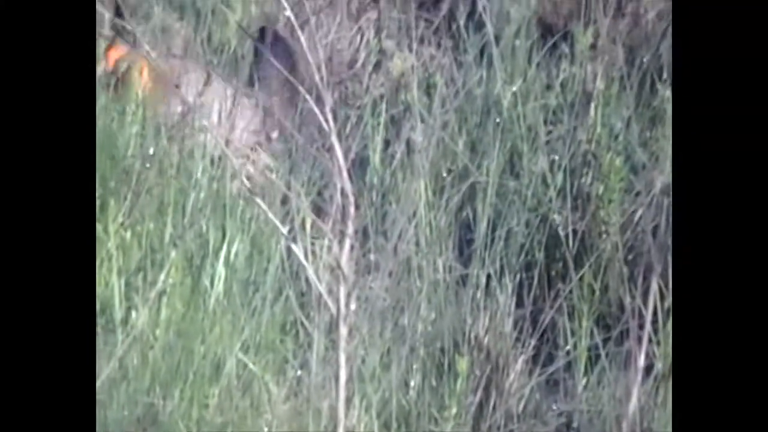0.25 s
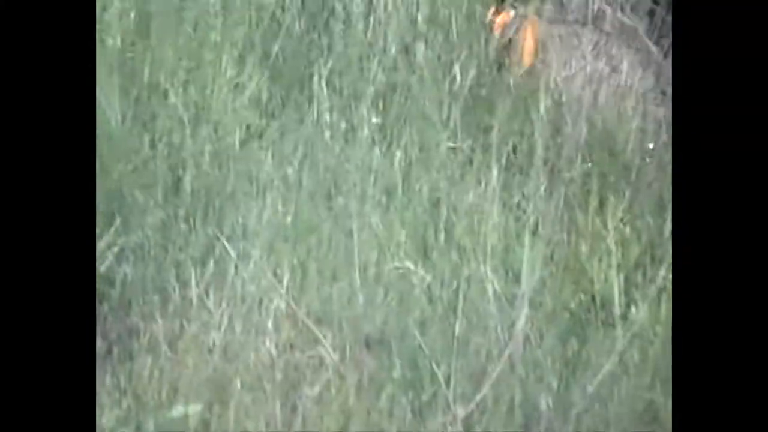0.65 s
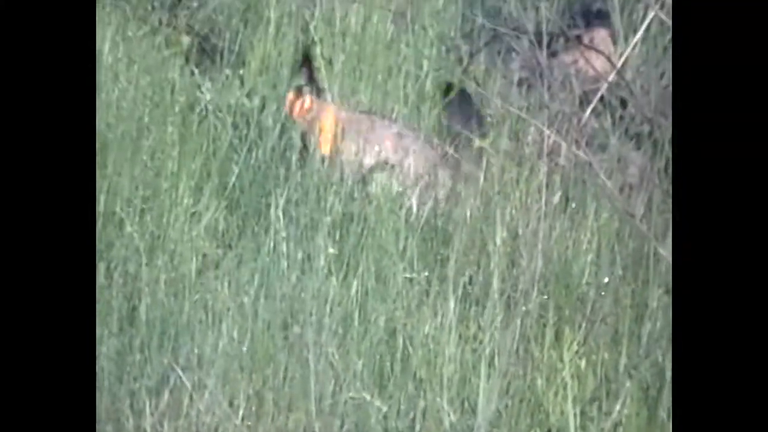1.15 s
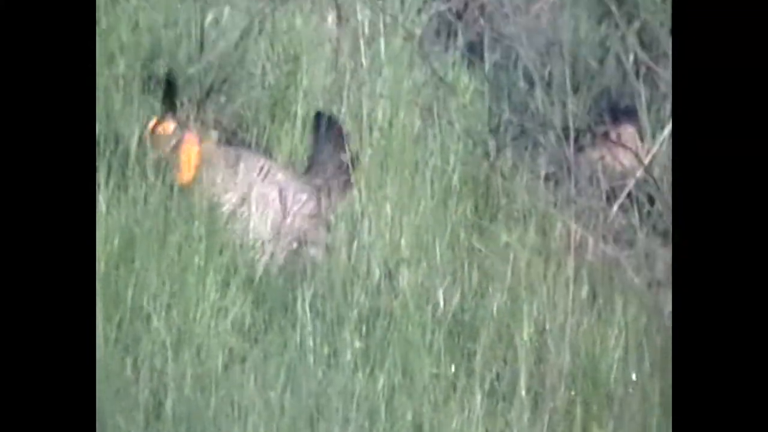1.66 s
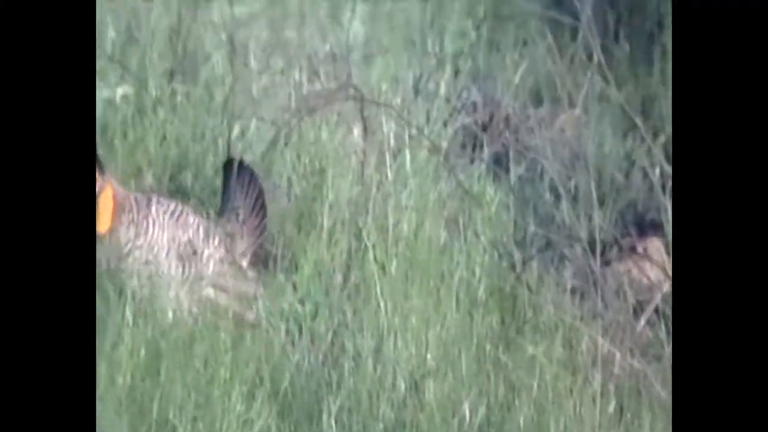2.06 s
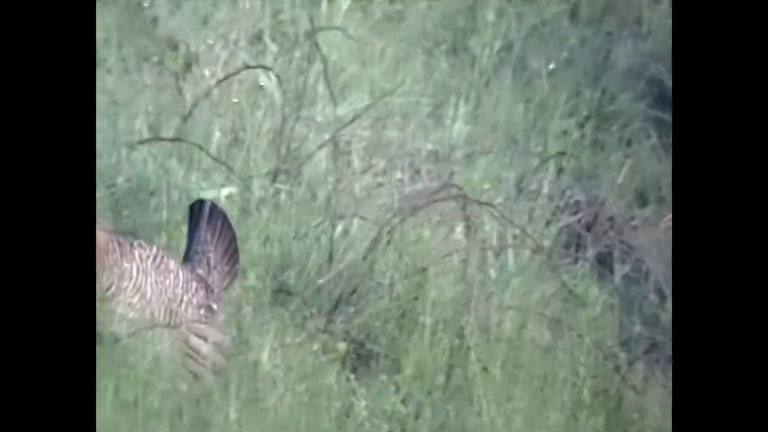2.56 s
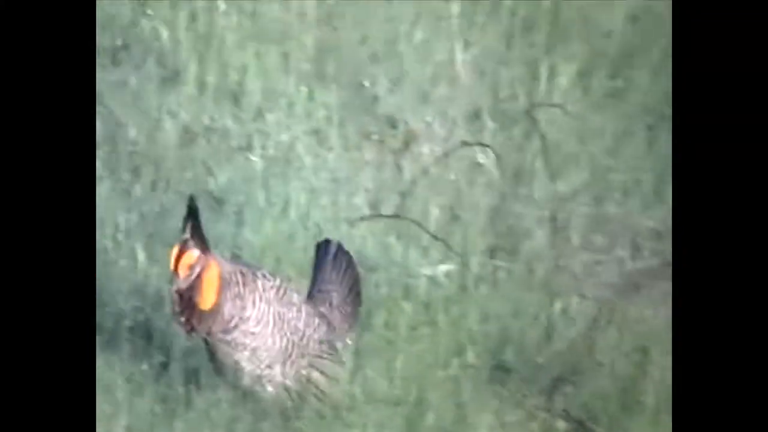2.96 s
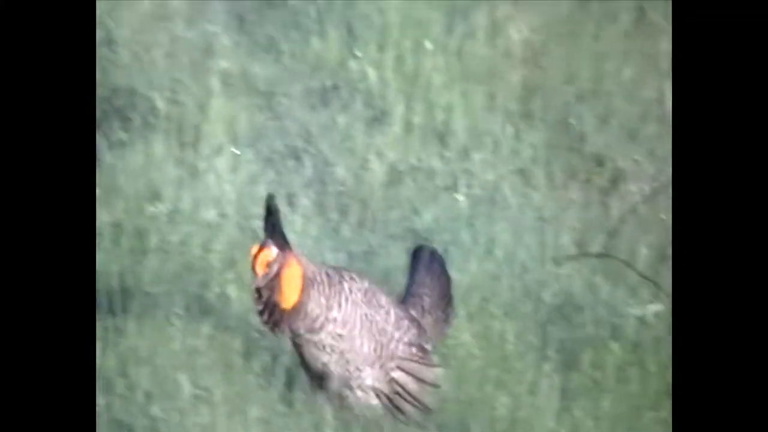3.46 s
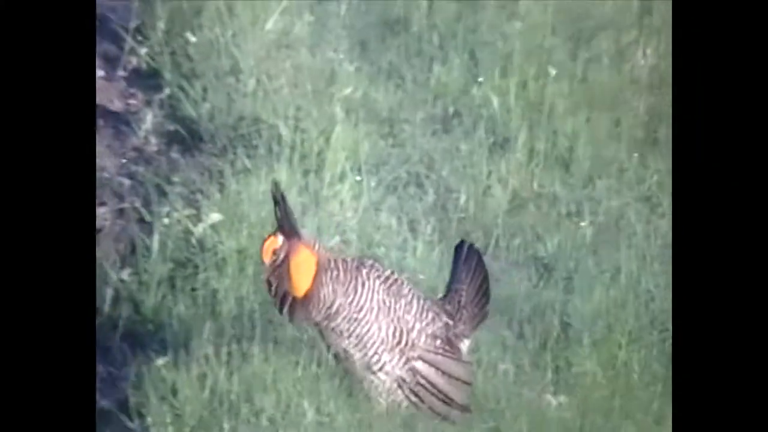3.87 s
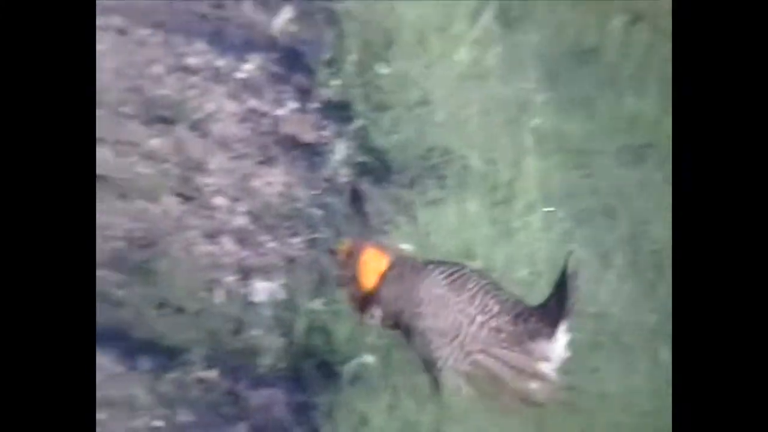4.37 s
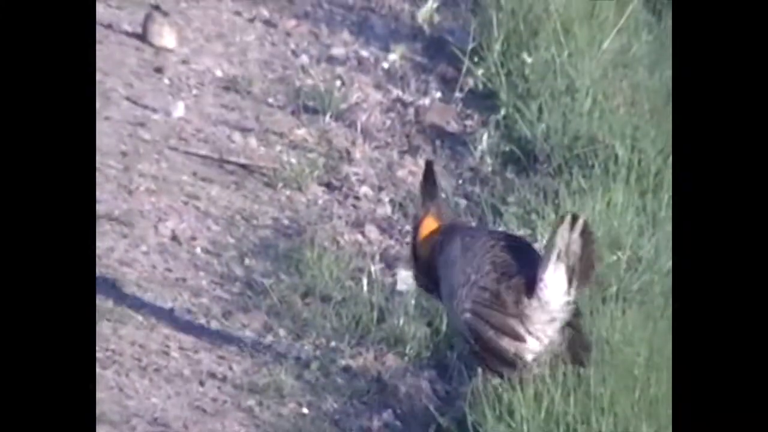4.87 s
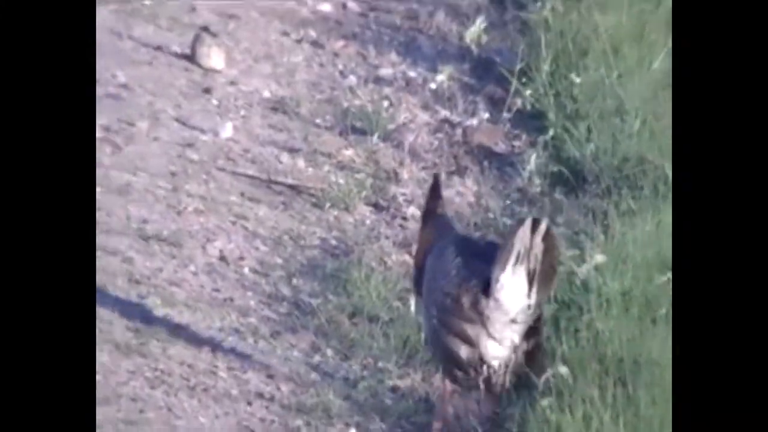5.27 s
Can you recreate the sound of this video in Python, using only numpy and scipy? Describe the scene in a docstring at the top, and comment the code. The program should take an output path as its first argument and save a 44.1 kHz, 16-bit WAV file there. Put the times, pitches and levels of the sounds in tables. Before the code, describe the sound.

A near small bird whistles three pure glides over soft rumble and hiss; later a distant buzz, a hoarse squawk and one small click.

```python
"""Quiet open grassland over a low rumble, thin hiss and a hand-guided camera's own faint whine.
At first a pulsing note (amplitude-modulated sine) dies away and a bird repeats high, warbled chips.
Then a near songbird slides through pure whistles (swept sines); other birds chip and whistle around it.
Later a far bird sings two falling phrases, a pulsed buzz sounds during the second, and a rising squawk
breaks into rasps. Handling knocks (damped sines) and rustles (filtered grains) recur; a modal click is last."""
import sys
import numpy as np
from scipy import signal
from scipy.fft import rfft, irfft
from scipy.io import wavfile

SR = 44100
rng = np.random.default_rng(int(sys.argv[2]) if len(sys.argv) > 2 else 0)


def materialize(psi):
    """Save the field psi as 16-bit PCM at rate SR to the path in sys.argv[1].

    A 1-D psi becomes a single channel; in a 2-D psi each row is a channel.
    """
    bounded = np.clip(np.atleast_2d(psi).T, -1, 1)
    quanta = np.round(bounded * 32767).astype(np.int16)
    wavfile.write(sys.argv[1], SR, quanta)


N = 243431  # length in samples


def amp(db):
    """Decibel law: converts a level to an amplitude gain."""
    return 10 ** (np.asarray(db) / 20)


def unit(x):
    """Normalisation: scales a signal to an rms of 1."""
    return x / np.sqrt(np.mean(x ** 2) + 1e-30)


def read(points, hz):
    """Interpolation of (frequency, value) points on a logarithmic frequency axis."""
    point_hz, value = np.transpose(points)
    return np.interp(np.log(hz + 1), np.log(point_hz + 1), value)


def coloured(x, db_at):
    """Spectral shaping: weights each frequency by the gain db_at(Hz), then scales to an rms of 1."""
    n = x.shape[-1]
    spectrum = rfft(x) * amp(db_at(np.fft.rfftfreq(n, 1 / SR)))
    return unit(irfft(spectrum, n))


def wander(n, per_s):
    """Random modulation: straight lines between normal random values, per_s of them a second."""
    return np.interp(np.arange(n) * per_s / SR, np.arange(4096), rng.standard_normal(4096))


def lowpass(x, edge_hz):
    """Band limiting: a steep linear-phase low-pass on both channels."""
    taps = signal.firwin(401, edge_hz, window=("kaiser", 8), fs=SR)
    return signal.oaconvolve(x, taps[None], "same")


def add(mix, s, sound, pan_db):
    """Intensity panning: adds a mono sound at s seconds, stronger on the left by pan_db."""
    sides = amp([[pan_db / 2], [-pan_db / 2]])
    part = mix[:, max(round(s * SR), 0):][:, :len(sound)]
    part += sides / sides.mean() * sound[:part.shape[1]]


def curves(rows):
    """Control curves: returns the start time and each column interpolated at every sample."""
    s, *columns = np.transpose(rows)
    t = np.arange(s[0], s[-1], 1 / SR)
    return s[0], *(np.interp(t, s, c) for c in columns)


def tone(hz, db):
    """Phase accumulation: a sine whose pitch and rms level follow the given curves."""
    return np.sqrt(2) * amp(db) * np.sin(2 * np.pi * np.cumsum(hz) / SR)


def scatter(x, delay, t60):
    """Diffuse reflection: a delayed, decaying cloud of random echoes, independent in each ear."""
    t = np.arange(SR // 2) / SR
    taps = rng.standard_normal((2, len(t))) * amp(-60 * t / t60)
    taps /= np.linalg.norm(taps, axis=1, keepdims=True)  # unit energy
    wet = signal.oaconvolve(x.mean(0)[None], taps, axes=1)
    return np.pad(wet, ((0, 0), (round(abs(delay) * SR), 0)))[:, :N]


def crackle(n, per_s):
    """Granular friction: random grains of uneven size over a soft hiss, all fluttering together."""
    size = amp(3.5 * np.minimum(rng.exponential(1, n), 3))
    grains = .2 + size * (rng.random(n) < per_s / SR)
    flutter = amp(3.5 * wander(n, 260))
    return rng.choice([-1, 1], n) * grains * flutter


def glide(length, hz, glide_hz, db, warble_hz=0):
    """Frequency modulation: a short sliding whistle, or a chip when its pitch warbles unevenly."""
    n = round(length * SR)
    turns = np.cumsum(90 * (1 + 0.33 * wander(n, 120))) / SR
    warble = 0.69 * np.sin(2 * np.pi * turns) + 0.4 * wander(n, 800)
    pitch = hz + glide_hz * np.linspace(-.5, .5, n) + warble_hz * warble
    dips_db = 6.6 * warble * (warble_hz > 0)  # a chip is loudest at the bottom of each warble
    return tone(pitch, db - dips_db) * signal.windows.tukey(n, .6)


def scrape(length, centre_hz, octaves, db):
    """Band-limited friction: crackle around centre_hz that starts quickly and fades."""
    n = SR // 4
    t = np.arange(n) / SR
    hiss = coloured(crackle(n, 1400), lambda f: -4.4 * (np.log2((f + 1) / centre_hz) / octaves) ** 2)
    envelope = np.interp(t / length, [0, .16, 1], [0, 1, 0])
    return amp(db) * hiss * envelope


# Pitch and level curves of the near bird's three long slides.
# Columns: time_s, pitch_hz, level_db
SLIDES = [
    [(0.6, 3828, -75.5), (0.62, 3790, -61.5), (0.686, 3608, -43), (0.72, 3450, -39.5), (0.746, 3417, -43),
     (0.77, 3410, -74)],
    [(1.15, 5270, -74.5), (1.166, 4963, -56.5), (1.19, 4916, -50.5), (1.216, 4960, -53), (1.284, 4600, -50),
     (1.39, 4355, -39.5), (1.398, 4327, -42.5), (1.408, 4280, -62)],
    [(1.475, 4065, -75), (1.565, 3940, -44), (1.609, 3916, -42.5), (1.699, 3126, -33.5), (1.747, 2959, -34),
     (1.787, 2910, -50.5), (1.825, 2895, -41.5), (1.919, 2921, -62.5), (1.95, 2894, -78.5)],
]
# a short, gently sinking note links the last two slides, and fades from its start
LINK_S, LINK_LENGTH_S, LINK_HZ, LINK_SAG_HZ_PER_S = 1.412, .105, 4760, 1500
LINK_DB, LINK_FADE_DB_PER_S = -47, 230


def near_song():
    """Pure-tone glides with diffuse reflection: echoes off the grass beat with the moving pitch."""
    out = np.zeros((2, N))
    for note in SLIDES:
        s, hz, db = curves(note)
        waver = 1 + .002 * wander(len(hz), 170)
        flutter_db = 1.3 * (hz / 4500) ** 2 * wander(len(hz), 220)  # deeper at high pitch
        voice = tone(hz * waver, db + flutter_db) * signal.windows.tukey(len(hz), .03)
        add(out, s, voice, pan_db=-6.7)
    t = np.arange(0, LINK_LENGTH_S, 1 / SR)
    link_hz = LINK_HZ - LINK_SAG_HZ_PER_S * t + 20 * wander(len(t), 170)
    link = tone(link_hz, LINK_DB - LINK_FADE_DB_PER_S * t)
    add(out, LINK_S, link * signal.windows.tukey(len(t), .35), pan_db=-9.5)
    grass = amp(-15) * scatter(out, delay=.002, t60=.07)
    late_echo = amp(-39) * scatter(out, delay=.08, t60=1.2)
    return out + grass + late_echo


# the note sinks and fades together, both easing out over the same time constant
PULSED_LENGTH_S, PULSED_FADE_S, PULSES_PER_S = .55, .19, 33.8
PULSED_HZ, PULSED_SAG_HZ, PULSED_DB, PULSED_DROP_DB = 2986, 149.5, -56.5, 33.5


def pulsed_note():
    """Amplitude modulation: a sinking whistle throbs as it dies away to a faint trace."""
    out, t = np.zeros((2, N)), np.arange(0, PULSED_LENGTH_S, 1 / SR)
    spent = 1 - np.exp(-t / PULSED_FADE_S)
    hz = PULSED_HZ - PULSED_SAG_HZ * spent + 12 * wander(len(t), 150)
    db = PULSED_DB - PULSED_DROP_DB * spent + 2.1 * wander(len(t), 90)
    throb = 1 - .5 * np.cos(2 * np.pi * PULSES_PER_S * t)
    add(out, 0, tone(hz, db) * throb, pan_db=-6.0)
    return out


# One bird's repeated high chip.
# Columns: start_s, pitch_hz, level_db
SERIES_CHIPS = [(.008, 4930, -71), (0.239, 4920, -68), (.36, 4970, -73), (0.483, 4960, -70),
                (.594, 4970, -69), (.703, 5150, -78.5), (.798, 5360, -81)]
SERIES_LENGTH_S, SERIES_FALL_HZ, SERIES_WARBLE_HZ = 0.057, 130, 240
# Single chips of other birds; pan is positive to the left.
# Columns: start_s, length_s, pitch_hz, glide_hz, level_db, pan_db
SINGLE_CHIPS = [(0.713, .043, 2710, -100, -72.5, -19), (1.032, .023, 5270, -430, -72.5, -13),
                (2.008, .05, 4400, 130, -72.5, -17), (2.015, .05, 3700, 100, -77, -12),
                (3.013, 0.074, 2923, -60, -71.5, 13), (3.72, 0.034, 2130, -71, -65, -14),
                (3.925, 0.068, 5730, 1401, -74.5, -8), (4.08, .04, 5720, 163, -76.5, 6)]
WARBLE_SHARE = 0.045  # warble depth of a single chip as a share of its pitch
# Two falling phrases of a far bird on the left.
# Columns: start_s, length_s, pitch_hz, glide_hz, level_db
ANSWER_NOTES = [(3.433, .14, 3930, -640, -73), (3.623, 0.049, 3430, -190, -73.5),
                (4.068, 0.069, 4103, -134, -70), (4.167, 0.045, 4384, -170, -70.5),
                (4.301, 0.11, 3700, -850, -81), (4.432, 0.08, 3100, -160, -71.5)]
ANSWER_PAN_DB = 18
# Faint far whistles, and at 2.07 s a faint echo of the near song.
# Columns: start_s, length_s, pitch_hz, glide_hz, level_db
FAINT_WHISTLES = [(.746, .11, 2990, -245, -78), (0.907, .13, 5720, 390, -76.5),
                  (2.07, 0.097, 2993, -10, -83.5), (2.804, .09, 2342, 17, -78),
                  (3.175, .13, 3650, -62, -83.5), (4.241, .16, 1735, 140, -76.5)]


def far_birds():
    """Frequency-modulated chips and plain glides, placed left and right by intensity panning."""
    out = np.zeros((2, N))
    for s, hz, db in SERIES_CHIPS:
        chip = glide(SERIES_LENGTH_S, hz, -SERIES_FALL_HZ, db, SERIES_WARBLE_HZ)
        add(out, s, chip, pan_db=6)
    for s, length, hz, glide_hz, db, pan_db in SINGLE_CHIPS:
        add(out, s, glide(length, hz, glide_hz, db, WARBLE_SHARE * hz), pan_db)
    for s, *note in ANSWER_NOTES:
        add(out, s, glide(*note), ANSWER_PAN_DB)
    for s, *note in FAINT_WHISTLES:
        add(out, s, glide(*note), pan_db=-4.5)
    return out


# the buzz starts loud, high and fast, and settles into a trill; pairs are (at the start, settled)
BUZZ_HZ, BUZZ_SWEEP_HZ, BUZZ_PER_S = (3081, 2906), (200, 405), (145, 65)
BUZZ_S, BUZZ_LENGTH_S, BUZZ_ATTACK_S, BUZZ_SETTLE_S = 4.018, .775, 0.023, .128
BUZZ_DB, BUZZ_ACCENT_DB, BUZZ_ACCENT_S = -73, 21.5, 0.11
# soon after its start it runs briefly clear
BUZZ_CLEAR_S, BUZZ_CLEAR_WIDTH_S = .072, .024
# it drops in from above, and drops away at the end
BUZZ_SCOOP_HZ, BUZZ_SCOOP_S, BUZZ_DROP_HZ, BUZZ_RELEASE_S = 454, 0.0082, 842, 0.03


def buzz():
    """Joint pitch and amplitude modulation: each pulse starts high, dips and steps down, louder."""
    out, t = np.zeros((2, N)), np.arange(0, BUZZ_LENGTH_S, 1 / SR)
    settled = 1 - 1 / (1 + (t / BUZZ_SETTLE_S) ** 6)
    pairs = (BUZZ_HZ, BUZZ_SWEEP_HZ, BUZZ_PER_S)
    hz, sweep_hz, per_s = (start + (end - start) * settled for start, end in pairs)
    clear = np.exp(-((t - BUZZ_CLEAR_S) / BUZZ_CLEAR_WIDTH_S) ** 2)
    release = np.clip(1 - (BUZZ_LENGTH_S - t) / BUZZ_RELEASE_S, 0, 1)
    hz = hz + BUZZ_SCOOP_HZ * np.exp(-t / BUZZ_SCOOP_S) - BUZZ_DROP_HZ * release
    db = BUZZ_DB + BUZZ_ACCENT_DB * np.exp(-t / BUZZ_ACCENT_S) - 3 * clear - 9 * release
    cycle = np.cumsum(per_s * (1 + .04 * wander(len(t), 60))) / SR % 1  # position within a pulse
    fall = 1.6 / (1 + (cycle / .3) ** 8) - .6  # from 1 early in the pulse to -0.6
    dip = 1 - .55 * np.exp(-((cycle - .28) / .14) ** 2)
    pulses = unit(np.sin(np.pi * cycle) ** .7 * dip * amp(2 * wander(len(t), 300)))
    pitch = hz + sweep_hz * (1 - .8 * clear) * fall + 30 * wander(len(t), 900)
    envelope = clear + (1 - clear) * pulses
    attack = np.minimum(t / BUZZ_ATTACK_S, 1) ** 2
    add(out, BUZZ_S, tone(pitch, db) * envelope * attack, pan_db=-6)
    return out


# Three loudness swells of the squawk.
# Columns: peak_s, level_db
SWELLS = [(4.996, -51.5), (5.03, -49), (5.054, -47.5)]
SQUAWK_S, SQUAWK_LENGTH_S, SWELL_WIDTH_S, SQUAWK_PAN_DB = 4.975, 0.113, 0.01, 6
SQUAWK_HZ, SQUAWK_CLIMB_HZ_PER_S, SQUAWK_LEAP_HZ, SQUAWK_LEAP_S = 1782, 2500, 250, 5.046
# Rasps of its upper voice.
# Columns: start_s, pitch_hz, level_db
UPPER_RASPS = [(5.013, 2770, -67.5), (5.058, 2934, -58.5), (5.077, 2715, -64.5), (5.1, 3305, -70.5),
               (5.13, 2660, -78)]
RASP_LENGTH_S, RASP_FALL_HZ, RASP_WARBLE_HZ = 0.0297, 200, 248


def squawk():
    """Growing random modulation: a clear note climbs, leaps and turns hoarse, with rasps above it."""
    out, t = np.zeros((2, N)), np.arange(0, SQUAWK_LENGTH_S, 1 / SR)
    now = SQUAWK_S + t
    leap = .5 + .5 * np.tanh((now - SQUAWK_LEAP_S) / 0.0077)
    hz = SQUAWK_HZ + SQUAWK_CLIMB_HZ_PER_S * t + SQUAWK_LEAP_HZ * leap
    swells = sum(amp(db) * np.exp(-((now - s) / SWELL_WIDTH_S) ** 2) for s, db in SWELLS)
    hoarse = np.linspace(0, 1, len(t)) * wander(len(t), 650)
    add(out, SQUAWK_S, tone(hz + 100 * hoarse, 2 * hoarse) * swells, SQUAWK_PAN_DB)
    edge = scrape(length=0.063, centre_hz=5400, octaves=0.39, db=-71.5)  # dry edge above the swells
    add(out, 5.017, edge, pan_db=0)
    for s, rasp_hz, db in UPPER_RASPS:
        rasp = glide(RASP_LENGTH_S, rasp_hz, -RASP_FALL_HZ, db, RASP_WARBLE_HZ)
        add(out, s, rasp, SQUAWK_PAN_DB)
    return out


# Modes of the small hard part that clicks; levels are relative to one another.
# Columns: pitch_hz, level_db, t60_s
SNAP_MODES = [(5130, -29, .022), (4900, -19, .018), (5680, 4, 0.007), (6680, 5.5, 0.0097),
              (7580, -6.5, 0.022), (9850, 10.5, 0.0058), (9960, -5, 0.0084), (10600, -32, .008),
              (12300, -29, .006)]
# Spectrum of the hiss that follows the click, as relative gain.
# Columns: frequency_hz, gain_db
SNAP_TAIL = [(4300, -20), (4900, 4.5), (6700, -2), (8300, -5), (9800, 2), (14000, -16)]


def click():
    """Modal ringing: a small hard part snaps and bounces once; the housing hisses briefly after it."""
    out, t = np.zeros((2, N)), np.arange(SR // 5) / SR
    ring = 0
    for k, (hz, db, t60) in enumerate(SNAP_MODES):
        # neighbouring modes swing in opposite directions, which spreads the snap over a moment
        ring = ring + (-1) ** k * amp(db - 60 * t / t60) * np.sin(2 * np.pi * hz * t)
    no_low_body = signal.butter(6, 4400, "highpass", fs=SR, output="sos")
    ring = signal.sosfilt(no_low_body, ring)
    add(out, 5.1729, amp(-47.5) * ring, pan_db=5)
    add(out, 5.1751, amp(-49.5) * ring, pan_db=1)  # the bounce
    tail = coloured(rng.standard_normal((2, len(t))), lambda f: read(SNAP_TAIL, f))
    tail = tail * amp(-53 - 60 * t / 0.089)
    out[:, round(5.1745 * SR):][:, :len(t)] += tail
    return out


HISS_EDGE_HZ = 12100  # upper limit of the rustles and of the background noise
# Knocks on the camera body; level is the ring's amplitude before its onset and decay.
# Columns: start_s, ring_hz, level_db, t60_s, pan_db
BODY_KNOCKS = [(0.9851, 242, -41.5, 0.025, -10), (.997, 122, -49.5, 0.053, 14),
               (1.474, 599, -46, 0.027, -5), (2.097, 790, -58, 0.035, 24), (3.407, 5670, -59, 0.028, 17),
               (4.16, 6660, -60, 0.11, 15), (4.828, 1340, -47, 0.017, -5)]
# A hand rubs the housing; level is before the rise and fade.
# Columns: start_s, length_s, centre_hz, width_octaves, level_db, pan_db
HAND_RUSTLES = [(0.186, 0.11, 1240, 1.28, -65.5, -8), (0.212, 0.16, 300, 1.05, -67.5, 9),
                (0.538, 0.1, 10100, 0.28, -73.5, 6), (1.41, 0.092, 7950, 0.44, -62.5, -3),
                (1.414, 0.11, 850, 4.4, -70, -9), (2.872, 0.067, 11700, 0.17, -70, 8),
                (3.073, 0.1, 9900, 1.3, -73.5, 1), (3.402, 0.025, 1390, 1.2, -68.5, 9),
                (4.33, 0.23, 370, .3, -75, -3)]
# Dry ticks of the housing; level is before the rise and fade.
# Columns: start_s, centre_hz, level_db
HOUSING_TICKS = [(.577, 8360, -62.5), (2.265, 2600, -72), (3.143, 5000, -68), (4.057, 10400, -66),
                 (4.16, 3900, -65.5), (4.826, 4200, -65), (4.826, 9300, -68), (4.973, 6200, -68.5)]
TICK_LENGTH_S, TICK_OCTAVES = 0.012, 0.35
BUMPS_PER_S, BUMPS_HZ, BUMPS_DB = 35, 360, -85.5  # soft random bumps of the grip


def handling():
    """Damped resonance and granular friction: knocks, rustles and ticks, with faint grains throughout."""
    knocks, rustles, t = np.zeros((2, N)), np.zeros((2, N)), np.arange(SR // 4) / SR
    for s, hz, db, t60, pan_db in BODY_KNOCKS:
        ring = np.sin(2 * np.pi * hz * np.cumsum(1 + 0.026 * wander(len(t), 900)) / SR)
        onset = 1 - np.exp(-t / 0.0016)
        add(knocks, s, ring * amp(db - 60 * t / t60) * onset, pan_db)
    for s, length, centre_hz, octaves, db, pan_db in HAND_RUSTLES:
        add(rustles, s, scrape(length, centre_hz, octaves, db), pan_db)
    for s, centre_hz, db in HOUSING_TICKS:
        add(rustles, s, scrape(TICK_LENGTH_S, centre_hz, TICK_OCTAVES, db), pan_db=-1)
    ticking = crackle(N, 68) * amp(2.9 * wander(N, 7.7))
    ticking = coloured(ticking, lambda f: -3 * np.log2((f + 1) / 7000) ** 2)
    add(rustles, 0, amp(-86.5) * ticking, pan_db=0.5)
    bumps = rng.standard_normal(N) * (rng.random(N) < BUMPS_PER_S / SR)
    bumps = coloured(bumps, lambda f: -9 * np.log2((f + 1) / BUMPS_HZ) ** 2)
    add(knocks, 0, amp(BUMPS_DB) * bumps, pan_db=1.5)
    out = knocks + lowpass(rustles, HISS_EDGE_HZ)
    return out + amp(-2.5) * scatter(out, delay=0.0014, t60=.07)


# Spectrum of the steady background, as relative gain.
# Columns: frequency_hz, gain_db
FLOOR_SPECTRUM = [(20, -15), (45, -5), (75, -0.5), (120, -2.5), (200, -14.5), (290, -13), (410, -15.5),
                  (495, -27.5), (600, -18), (800, -18), (1000, -19.5), (1150, -29), (1500, -23),
                  (2800, -26.5), (5500, -33), (11500, -46)]
FLOOR_DB = -67.5  # rms level before the slow swell, the low-pass and the slight lean to the left
# Left-right correlation of the background.
# Columns: frequency_hz, correlation
LIKENESS = [(100, 0.65), (370, 0.19), (750, -0.56), (1300, -0.45), (4200, 0.039)]
# Whine of the camera motor.
# Columns: pitch_hz, level_db
MOTOR_WHINE = [(80.5, -79), (608, -98), (3297, -91), (3920, -99)]


def background():
    """Partial coherence: shaped noise in part shared by both ears, under wavering motor tones."""
    a, b = rfft(rng.standard_normal((2, N)))
    same = np.clip(read(LIKENESS, np.fft.rfftfreq(N, 1 / SR)), -1, 1)
    right = same * a + np.sqrt(1 - same ** 2) * b
    noise = irfft(np.array([a, right]), N)
    swell_db = .8 * wander(N, 11)
    air = amp(FLOOR_DB + swell_db) * coloured(noise, lambda f: read(FLOOR_SPECTRUM, f))
    lean = amp([[.4], [-.4]])  # dB, left and right
    whine = sum(tone(hz + 2.4 * wander(N, 23), db + 0.78 * wander(N, 13.0)) for hz, db in MOTOR_WHINE)
    return lowpass(air, HISS_EDGE_HZ) * lean + whine


def scene():
    """Superposition: all sources add, the farther birds more blurred by the grass than the near one."""
    far = far_birds() + buzz() + pulsed_note() + squawk()
    blur = amp(-7.5) * scatter(far, delay=.003, t60=0.14)
    return near_song() + far + blur + handling() + click() + background()


def record(dry):
    """Band limiting: the camera passes little above 14.9 kHz."""
    return lowpass(dry, 14900)


dry = scene()
out = record(dry)
materialize(out)
```